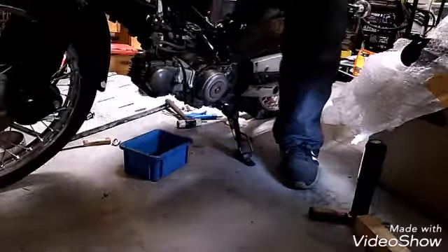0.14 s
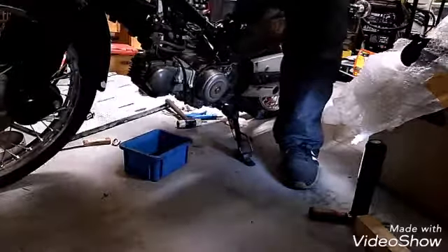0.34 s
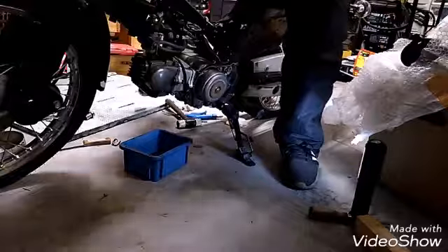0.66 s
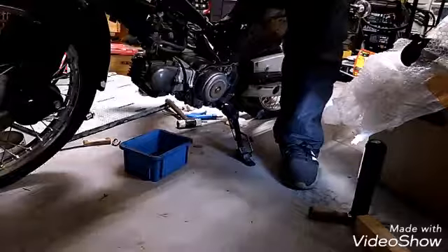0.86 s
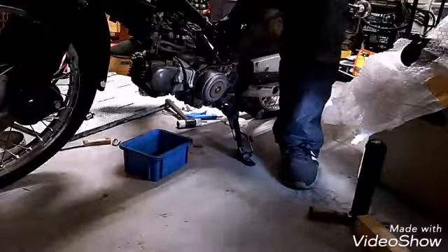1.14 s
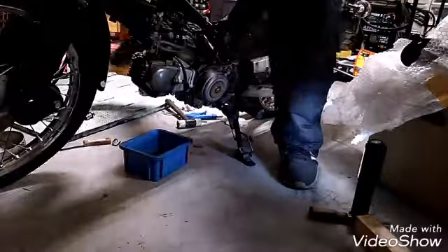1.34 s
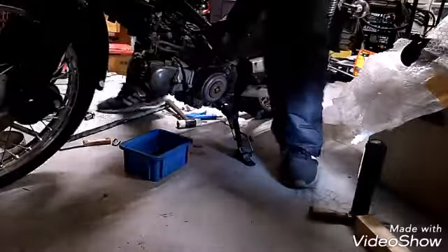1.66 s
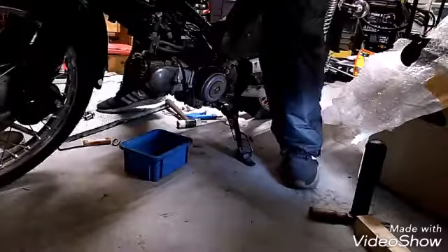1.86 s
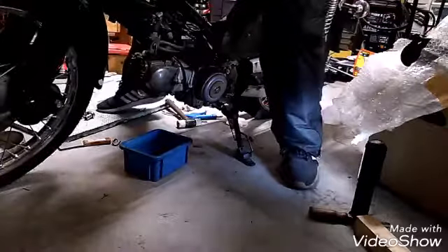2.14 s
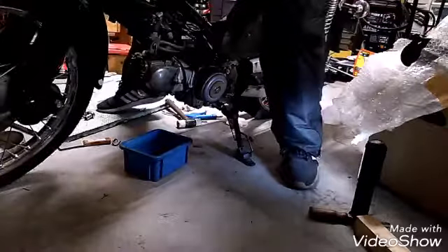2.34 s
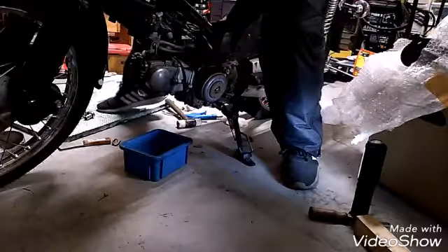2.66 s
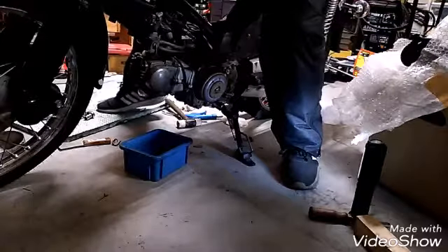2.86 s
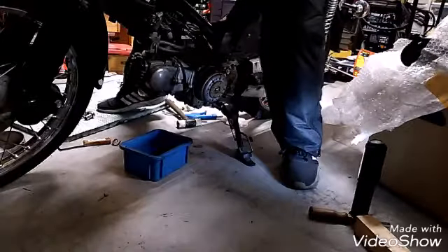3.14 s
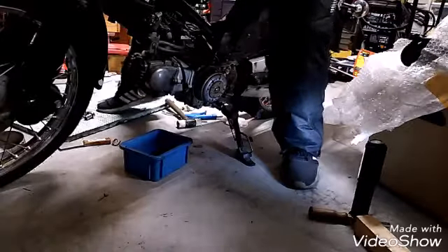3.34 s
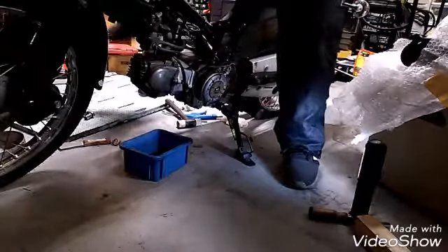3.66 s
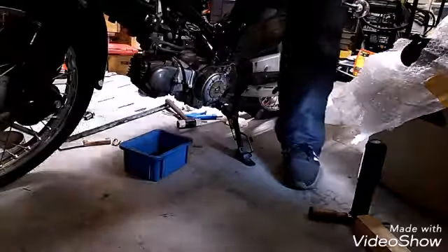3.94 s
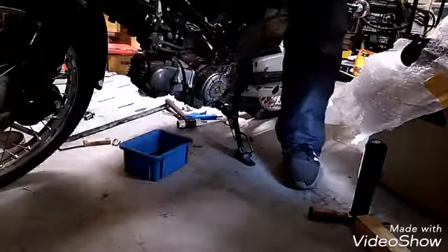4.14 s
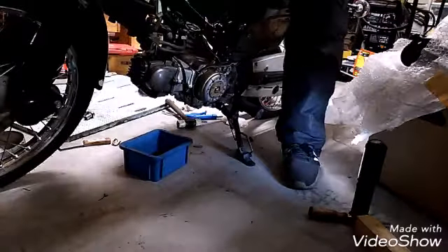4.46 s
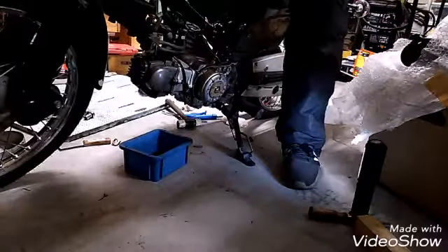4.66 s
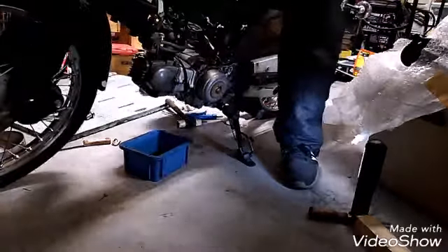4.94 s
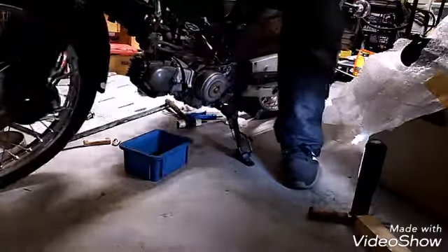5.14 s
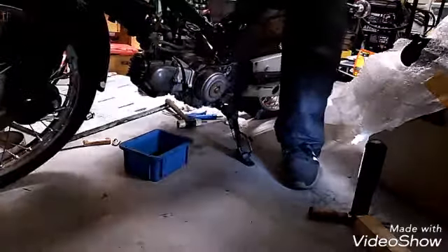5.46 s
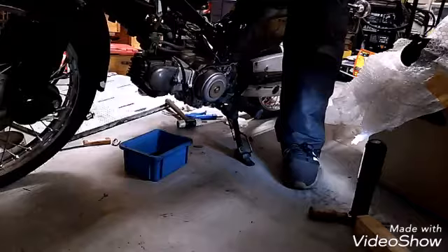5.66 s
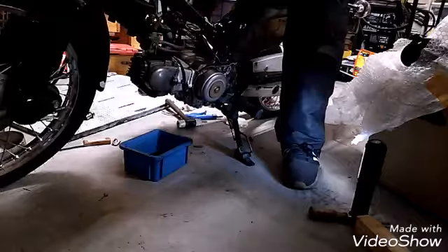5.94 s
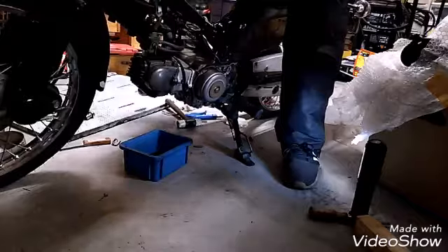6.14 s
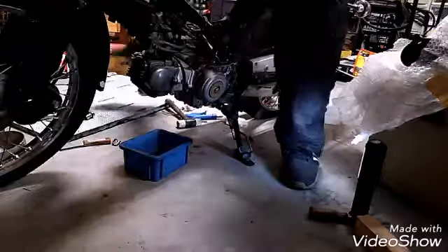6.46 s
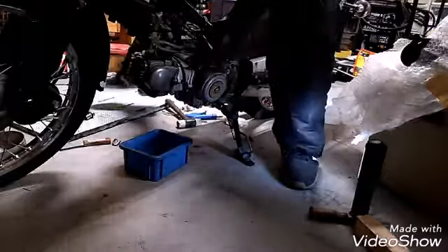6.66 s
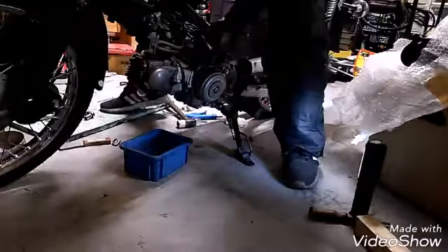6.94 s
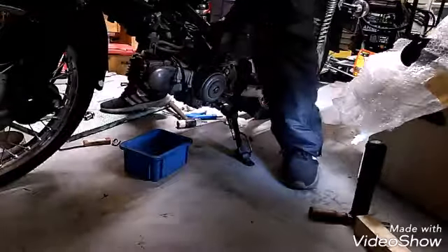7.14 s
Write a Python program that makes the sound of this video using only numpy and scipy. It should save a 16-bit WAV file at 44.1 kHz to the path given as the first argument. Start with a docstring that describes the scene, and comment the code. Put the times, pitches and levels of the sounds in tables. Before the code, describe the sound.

A small single-cylinder motorcycle idles close by in a garage, with low exhaust puffs, dense metallic clatter and loose clanks. It stumbles, recovers, then coasts down with whirring gears and a tiny squeak. Trousers rustle and a shoe taps metal in the quiet. One hard kick thuds and scrapes; the engine catches, flares briefly and idles on, rattling. Close stereo pickup.

```python
"""A garage, two microphones: a small single-cylinder motorcycle idles, falters and coasts to a stop.
Trousers rustle, a shoe taps the kick lever; one kick, and the engine catches, flares and idles again.
It fires every second turn: a boom of crank orders and a bark from the exhaust, three knocks in the cases.
Filtered noise makes the clatter, cloth, scrapes and room tone; decaying modes make the metal ring.
Each blow adds the garage's tail after the direct sound."""
import sys
import numpy as np
from scipy import signal
from scipy.fft import rfft, irfft, next_fast_len
from scipy.io import wavfile
from scipy.ndimage import uniform_filter1d, map_coordinates

SR = 44100
rng = np.random.default_rng(int(sys.argv[2]) if len(sys.argv) > 2 else 0)


def to_wav(s):
    """Save 16-bit WAV."""
    ch = np.atleast_2d(s).T  # columns
    pcm = np.round(np.clip(ch, -1, 1) * 32767)  # PCM
    wavfile.write(sys.argv[1], SR, pcm.astype(np.int16))


N = 321930
TIME = np.arange(N) / SR
SIZE = 2 * next_fast_len(N // 2 + SR // 4)   # transform length, with room for ringing
HZ = np.maximum(np.arange(SIZE // 2 + 1) * SR / SIZE, 1)


def from_db(db):
    """Decibels to gain."""
    return 10 ** (np.asarray(db) / 20)


def curve(points):
    """A table by frequency, joined on a log axis."""
    hz, value = np.transpose(points)
    return np.interp(np.log(HZ), np.log(hz), value)


def below(hz):
    """A steep low-pass slope in dB."""
    return np.maximum(-10 * np.log10(1 + (HZ / hz) ** 8), -90)


def above(hz):
    """The matching high-pass slope in dB."""
    return np.maximum(-10 * np.log10(1 + (hz / HZ) ** 8), -90)


def resonance(hz, width_hz):
    """One narrow peak with steep skirts, in dB."""
    return np.maximum(-20 * np.log10(1 + (2 * (HZ - hz) / width_hz) ** 2), -90)


def ramp(start_s, length_s):
    """Rises evenly from 0 to 1."""
    return np.clip((TIME - start_s) / length_s, 0, 1)


def hump(s, width_s):
    """A bell of height 1."""
    return np.exp(-((TIME - s) / width_s) ** 2)


def flicker(per_s, depth_db):
    """A randomly wandering gain."""
    return from_db(depth_db * np.interp(TIME * per_s, np.arange(N), rng.standard_normal(N)))


def flutter(x, per_s, band_hz, depth_db):
    """Every narrow band swells and sinks on its own, as different parts take turns to sound."""
    hz, s, cells = signal.stft(x, SR, nperseg=512)
    chance = rng.standard_normal(size=(200, 800))
    places = np.meshgrid(hz / band_hz, s * per_s, indexing="ij")
    gain = from_db(depth_db * map_coordinates(chance, places, order=1, mode="wrap"))
    steady = gain / np.sqrt(np.mean(gain ** 2))
    return signal.istft(cells * steady, SR)[1][:, :N]


def causal(x, gain):
    """Minimum-phase filter: resonances ring after their cause."""
    cepstrum = irfft(np.log(gain + 1e-9))
    cepstrum[1:SIZE // 2] *= 2
    cepstrum[SIZE // 2 + 1:] = 0
    return irfft(rfft(x, SIZE) * np.exp(rfft(cepstrum)))[:N]


# how far the two microphones are opposed: f/Hz, side minus mid level/dB
OPPOSED = [(60, 9), (150, 4), (300, 12.5), (500, 8.5), (900, 2), (1500, 2.5), (2200, 1), (4000, 0.5),
           (8000, 1)]


def radiate(drive, colour_db, lifts=(0, 0), opposed_db=0):
    """Countless tiny contacts of strength `drive`, coloured and scattered to both microphones."""
    mid_gain = from_db(colour_db + lifts[0])
    side_gain = from_db(colour_db + lifts[1] + curve(OPPOSED) + opposed_db)
    scale = np.sqrt(np.mean(mid_gain ** 2 + side_gain ** 2))
    mid = causal(drive * rng.standard_normal(N), mid_gain / scale)
    side = causal(drive * rng.standard_normal(N), side_gain / scale)
    return np.array([mid + side, mid - side])


def blows(times, levels_db, t60, rise, garage_db, garage_t60):
    """Envelope of blows: a quick rise, a short ring and the garage's longer tail (times in s)."""
    power, age = np.zeros(N), TIME[:SR // 2]
    # -120 dB here because the shape is a power, not an amplitude
    shape = from_db(-120 * age / t60) + from_db(2 * garage_db - 120 * age / garage_t60)
    shape = shape * (1 - np.exp(-age / rise)) ** 2
    for s, gain in zip(times, from_db(levels_db)):
        at = int(np.clip(s * SR, 0, N - 1))
        power[at:at + len(age)] += gain ** 2 * shape[:N - at]
    return np.sqrt(power)


def modes(times, levels_db, table, uneven_db, contact_hz):
    """Blows ring a table of modes, each with a new strength every time; a low-pass softens the contact."""
    at = np.clip(np.asarray(times) * SR, 0, N - 1).astype(int)
    out = np.zeros(N)
    for hz, db, t60 in table:
        sizes_db = levels_db + db + uneven_db * rng.standard_normal(len(at))
        clicks = np.zeros(N)
        clicks[at] = from_db(sizes_db) * rng.choice([-1, 1], len(at))
        r, w = from_db(-60 / (t60 * SR)), 2 * np.pi * hz / SR
        # the tiny offset keeps the filter's state from fading to denormal numbers
        out += signal.lfilter([0, np.sin(w)], [1, -2 * r * np.cos(w), r * r], clicks + 1e-18)
    return signal.sosfilt(signal.butter(4, contact_hz, fs=SR, output="sos"), out)


def by_hardness(rows, focus_db):
    """Rows of (s, dB, hardness) as rows of (s, thud dB, ring dB, bright dB)."""
    s, db, hardness = np.transpose(rows)
    return np.transpose([s] + [db - focus_db * (hardness - band) ** 2 for band in (0, .5, 1)])


def strikes(rows, colour_db, lifts, t60s, rise, garage_db):
    """Blows that each have their own share of thud, ring and brightness."""
    s, *levels = np.transpose(rows)
    bands = below(1100), above(1600) + below(2900), above(3700)
    parts = []
    for db, t60, band in zip(levels, t60s, bands):
        envelope = blows(s, db, t60, rise, garage_db, garage_t60=0.46)
        parts.append(radiate(envelope, colour_db + band, lifts))
    return sum(parts)


# resonances of the engine cases: f/Hz, width/Hz, common lift/dB, opposed lift/dB
CASES = [(518, 60, 7.5, 10), (610, 81, 4.5, -0.5), (861, 72, 5, 2.5), (865, 640, 6, 12.5),
         (1050, 37, -9, -10), (1710, 92, 2.5, 8), (1880, 100, -2.5, -8.5), (2184, 60, 6, 2.5),
         (2245, 61, -5, -3.5), (2320, 380, 4, 5), (2670, 70, -3.5, 6), (3376, 92, 4.5, 10.5),
         (3636, 94, 8, -1), (4250, 230, 3, 9), (4560, 68, 7, -1), (5075, 250, 7.5, 8.5),
         (5175, 130, -9.5, -9.5), (5326, 65, 7, 3.5), (5790, 79, 3.5, -1.5), (6180, 122, -8.5, -1.5),
         (6250, 320, 1, 9), (6560, 151, 5, -7.5), (7690, 157, -2, -14), (7630, 430, 9, 4)]


def case_lifts():
    """The case resonances as dB bumps, common to both microphones and opposed."""
    bumps = np.array([1 / (1 + (2 * (HZ - hz) / max(width, hz / 50)) ** 2) for hz, width, _, _ in CASES])
    return np.array(CASES)[:, 2:].T @ bumps


# crank speed in each run, from the first firing to the last: t/s, speed/turns per s
FIRST_SPEED = [(0, 23.2), (0.25, 18.9), (0.55, 17.97), (1.1, 20.01), (1.5, 18.21), (1.62, 13.47),
               (1.85, 16.97), (2.1, 19.13), (2.45, 20.1), (2.9, 18.2), (3.08, 14)]
SECOND_SPEED = [(5.105, 27.2), (5.4, 23.67), (5.7, 20.2), (6.1, 19.55), (6.4, 20.89), (7.3, 20.7)]


def speed_runs():
    """For each run, turns completed and turns per second over time; no speed outside the run."""
    speeds = [np.interp(TIME, *np.transpose(run), left=0, right=0) for run in (FIRST_SPEED, SECOND_SPEED)]
    return [(np.cumsum(speed) / SR, speed) for speed in speeds]


def crank_times(phases):
    """The moments in every four-stroke cycle when the crank is `phases` turns past firing; a row per cycle."""
    rows = []
    for turn, speed in speed_runs():
        firings = np.arange(0, turn[-1], 2)
        rows.append(np.interp(firings[:, None] + phases, turn[speed > 0], TIME[speed > 0]))
    return np.vstack(rows)


CATCH_S, CATCH_RISE_S = 5.13, 0.026


def flare(decay_s):
    """Swells as the engine catches, then dies away."""
    return ramp(CATCH_S, CATCH_RISE_S) * np.exp(-np.abs(TIME - CATCH_S) / decay_s)


def restarted(db):
    """A gain that sets in as the engine catches again."""
    return from_db(db * ramp(CATCH_S, CATCH_RISE_S))


# the engine coasts to rest; its noise falls as a power of the motion that is left
COAST_S, REST_S, COAST_POWER = 2.684, 3.264, 4.4


def motion():
    """Share of the motion left in the first run: 1 until it coasts, 0 at rest."""
    return 1 - ramp(COAST_S, REST_S - COAST_S) ** 2


FALTER_S, FALTER_WIDTH_S, FALTER_DB = 1.639, 0.1, -5
# the kick takes up the slack quietly, then spins the crank
SLACK_S, SLACK_DB, SPIN_S, SPIN_RISE_S = 5.004, -20, 5.038, 0.019
FLARE_DB, FLARE_DECAY_S, SECOND_IDLE_DB = 5.5, 0.14, 0.42


def effort():
    """How hard the engine shakes, 1 at the first idle: falter and coast, then kick, flare and idle."""
    first = from_db(FALTER_DB * hump(FALTER_S, FALTER_WIDTH_S)) * motion() ** COAST_POWER
    slack = from_db(SLACK_DB) * ramp(SLACK_S, SPIN_S - SLACK_S)
    started = np.maximum(slack, ramp(SPIN_S, SPIN_RISE_S) ** 2)
    return first + started * from_db(SECOND_IDLE_DB + FLARE_DB * flare(FLARE_DECAY_S))


# spectrum of the garage at rest, in the opposed part of the pair: f/Hz, level/dB per Hz
ROOM = [(18, -24), (30, 5.5), (92, 0.5), (176, -6.5), (400, -11), (629, -19), (794, -25), (2080, -31.5),
        (5170, -34), (6700, -21.5), (9390, -37.5), (10400, -46), (15000, -51.5)]
ROOM_DB = -68.5


def room_tone():
    """The quiet garage: steady noise, scattered to both microphones."""
    return radiate(from_db(ROOM_DB), curve(ROOM) - curve(OPPOSED))


# the leg moves in smooth swells: start t/s, length/s, rub level/dB, hiss level/dB
LEG_MOVES = [(3.401, 0.76, -2, -1), (3.502, 0.083, -10, -12), (3.648, 0.14, -25, -7),
             (3.796, 0.31, -3, -15), (4.108, 0.37, -6.5, -4), (4.496, 0.095, -10.5, -9.5)]
SWELL_POWER = 0.75


def leg_motion():
    """Strength of the cloth's dull rub and of its hiss over time."""
    arches = [np.sin(np.pi * ramp(s, length)) for s, length, _, _ in LEG_MOVES]
    swells = np.abs(arches) ** SWELL_POWER
    return from_db(np.array(LEG_MOVES)[:, 2:].T) @ swells


# spectrum of trousers and shoe: f/Hz, level/dB per Hz
CLOTH = [(59, -29), (100, 17), (217, 2), (279, -3), (452, -11), (570, -5.5), (748, -4.5), (849, -9),
         (1000, -5.5), (3180, -10.5), (3920, -8.5), (5300, -6), (6600, -6), (7600, -5.5), (15000, -50)]
RUB_DB, HISS_DB, SWAY_DB = -57.5, -54, -66.5
# shoe on lever and floor: t/s, level/dB, hardness (0 thud, 1 bright scuff), favoured frame pitch f/Hz
TAPS = [(3.425, -51.5, 0.83, 1400), (3.547, -52, 0.46, 760), (3.834, -54, 0.11, 740),
        (3.899, -45.5, 0.32, 1200), (3.908, -49, .1, 760), (3.94, -54, .05, 760), (4.345, -47, 0.073, 1330),
        (4.354, -49.5, 0.063, 540), (4.378, -51, 0.074, 540), (4.516, -57, 0.95, 1400),
        (4.535, -56, 1.3, 1400), (4.618, -64, 0.95, 1400), (4.684, -60, 1.04, 1400),
        (4.696, -63.5, 0.99, 1400), (4.87, -71, 0.35, 590)]
TAP_FOCUS_DB = 46
# the frame under a thudding tap or the kick: f/Hz, level/dB, t60/s
FRAME = [(483, -7, 0.23), (600, 1, 0.12), (738, 4.5, .15), (1160, 8, 0.096), (1330, 1, 0.069),
         (1450, -2, 0.11), (1590, 0, 0.11), (2094, -9, .1), (2430, 1, .05)]
FRAME_DB, FRAME_FOCUS_DB = -2, 31   # the last: loss one octave from the favoured pitch
# kick lever clicking on its pivot: t/s, level/dB, sharpness of contact f/Hz
CLICKS = [(3.427, -39.5, 4200), (4.69, -55, 9100)]
# modes of the kick lever: f/Hz, level/dB, t60/s
LEVER = [(1790, -10, 0.058), (1890, -7.5, 0.044), (2100, -19, .025), (3770, -17, .05), (4450, -19, .05),
         (5500, -2.5, .05), (6630, 2, .055), (7100, -2, .045), (7950, -5, .05)]


def rider():
    """Cloth slides as the leg lifts; the shoe taps the lever, which clicks, and the frame rings and rocks."""
    rubbing, hissing = leg_motion()
    rub_drive = from_db(RUB_DB) * rubbing * flicker(40, depth_db=1.0)
    rub = radiate(rub_drive, curve(CLOTH) + above(330) + below(3200))
    hiss_drive = from_db(HISS_DB) * hissing * flicker(530, depth_db=0.5)
    hiss = radiate(hiss_drive, curve(CLOTH) + above(2500))
    cloth = flutter(rub + hiss, per_s=27, band_hz=246, depth_db=3.5)

    touches, pitch = by_hardness(np.array(TAPS)[:, :3], TAP_FOCUS_DB), np.array(TAPS)[:, 3]
    tap_colour = curve(CLOTH) + above(306)
    taps = strikes(touches, tap_colour, (0, 0), t60s=(.08, .055, .05), rise=0.001, garage_db=-13.0)

    s, thud, _, _ = touches.T
    frame = np.zeros(N)
    for mode in FRAME:
        off_pitch_db = FRAME_FOCUS_DB * np.log2(mode[0] / pitch) ** 2
        frame += modes(s, thud + FRAME_DB - off_pitch_db, [mode], uneven_db=3.0, contact_hz=3000)
    clicks = sum(modes([s], db, LEVER, uneven_db=2.0, contact_hz=hz) for s, db, hz in CLICKS)
    metal = frame * np.array([[1], [-.4]]) + clicks * np.array([[1], [-.2]])
    rocking = radiate(from_db(SWAY_DB) * rubbing, above(66) + below(115) + below(164))
    return cloth + taps + metal + rocking


# the cover rings more in swells: t/s, width/s, lift/dB
COVER_SWELLS = [(.45, 1, 5.8), (5.2, 0.32, 6.5), (7.059, 0.12, 18)]
COVER_DB = -51


def cover(force, hz=499, width_hz=17):
    """Engine vibration keeps a thin loose cover ringing in a narrow band."""
    swell_db = sum(db * hump(s, width) for s, width, db in COVER_SWELLS)
    return radiate(force * from_db(COVER_DB + swell_db), resonance(hz, width_hz))


# what slack parts chatter with: f/Hz, level/dB, t60/s
LOOSE = [(1233, 3, 0.035), (1444, 4, 0.056), (1741, 6, 0.061), (2216, 3.5, .09), (2510, 2.5, 0.11),
         (2720, 3.5, 0.13), (4670, 5, 0.09), (5070, 4, 0.0896), (5500, 2, 0.21), (6490, 7, 0.047)]
RATTLE_DB, RATTLE_RESTART_DB = -44.5, 0.5   # the second is added after the restart


def loose_parts(force, uneven_db=4.0):
    """Slack parts chatter at random, and each touch rings a few modes more than the rest."""
    def chatter():
        return modes(rng.uniform(0, N / SR, size=420), -9.5, LOOSE, uneven_db, contact_hz=7000)
    common, opposed = chatter(), chatter()
    level = from_db(RATTLE_DB) * restarted(RATTLE_RESTART_DB) * force
    return level * np.array([common + opposed, common - opposed])


# what a clanking part rings with: f/Hz, t60/s
CLANK_MODES = [(880, 0.042), (1440, 0.077), (1600, 0.076), (1750, 0.08), (2205, 0.068), (2480, 0.028),
               (3150, 0.035), (3590, 0.08), (4150, 0.03), (4600, 0.05), (5355, 0.046)]
CLANK_RING_DB, SOFTEST_HZ, HARDNESS_OCTAVES = -3, 623, 3.25
OFF_PITCH_DB = 56.5   # loss one octave off, growing as the square


def clank_ring(clanks):
    """Each clank rings the few modes near the pitch that its hardness sets."""
    s, db, hardness = np.transpose(clanks)
    pitch = SOFTEST_HZ * 2 ** (HARDNESS_OCTAVES * hardness)
    ring = np.zeros(N)
    for hz, t60 in CLANK_MODES:
        level_db = db + CLANK_RING_DB - OFF_PITCH_DB * np.log2(hz / pitch) ** 2
        ring += modes(s + 0.00201, level_db, [(hz, 0, t60)], uneven_db=0.5, contact_hz=8100)
    return ring


# spectrum of metal on metal, shared by clanks, ratchet and clatter: f/Hz, level/dB per Hz
METAL = [(60, -13), (180, -10.5), (300, -5.5), (700, -14.5), (1400, 2), (2300, -2), (3100, -1.5),
         (5000, -0.5), (6600, 0.5), (7800, -8.5), (9000, -12), (10200, -24.5), (12000, -38), (15000, -47)]
# loud clanks from the engine and its slack parts: t/s, level/dB, hardness (0 thud, .5 ring, 1 bright crack)
CLANKS = [(1.573, -28, 0.45), (1.678, -21.5, 0.24), (1.70, -33, 0.11), (1.806, -24, 0.27),
          (1.961, -27.5, 0.71), (2.299, -21, 0.99), (2.381, -20, 0.69), (2.386, -22.5, 0.94),
          (2.863, -31.5, 0.48), (5.228, -23, 0.53), (5.321, -26.5, 0.44), (5.544, -23, 0.28),
          (5.407, -31, 0.57), (5.635, -25.5, 0.57), (6.046, -19.5, 0.56), (6.119, -29, 0.51),
          (6.289, -23.5, 0.54), (6.405, -28, 0.036), (6.652, -33, 0.51), (6.697, -30.5, 0.4),
          (6.805, -27.5, 0.28), (6.825, -21.5, 0.46), (6.865, -39, 0.25), (6.995, -17.5, 0.61),
          (7.011, -25, 0.78), (7.033, -28.5, .4), (7.059, -26, 0.53), (7.085, -22, 0.76),
          (7.226, -28, 0.49), (7.274, -24.5, 0.45)]
CLANK_FOCUS_DB = 35.5


def clacks(lifts, sharpen=1.2, crack_db=1.0, common_db=-4.5):
    """Hard metal blows: a crack, and the parts and cases ring on."""
    clanks = np.array(CLANKS)
    rows = by_hardness(clanks + [0, crack_db, 0], CLANK_FOCUS_DB)
    colour = curve(METAL) + above(280)
    crack = strikes(rows, colour, sharpen * lifts, t60s=(.055, .04, .035), rise=0.0028, garage_db=-14)
    common, opposed = from_db(common_db) * clank_ring(clanks), clank_ring(clanks)
    return crack + np.array([common + opposed, common - opposed])


# spectrum of gears and chain: f/Hz, level/dB per Hz
GEARS = [(1900, -15.5), (2180, -6), (2380, -14.5), (2570, -2.5), (2950, -14), (3900, -9.5), (4250, -0.5),
         (4750, -17), (5150, -4.5), (5800, -25), (6400, 8.5), (6630, -6), (6850, 0), (7500, -12.5),
         (8500, -11), (11000, -50)]
# surges as the slowing crank drags over compression: t/s, level/dB
SURGES = [(2.848, -36), (2.955, -39), (3.015, -39)]
WHIRR_DB, WHIRR_FROM_S, WHIRR_RISE_S = -41, 1.8, 1.2
WHIRR_POWER = 2.35   # fades more slowly than the rest
SQUEAK_S, SQUEAK_DB, SQUEAK_HZ = 3.165, -50.5, 8480


def whirr(lifts):
    """Gears and chain sing on as the drive goes slack, surge, and squeak once as the crank stops."""
    song = from_db(WHIRR_DB) * ramp(WHIRR_FROM_S, WHIRR_RISE_S) * motion() ** WHIRR_POWER
    surges = blows(*np.transpose(SURGES), t60=0.093, rise=0.015, garage_db=-18.0, garage_t60=0.23)
    gears = radiate(np.hypot(song, surges) * flicker(70, depth_db=5.5), curve(GEARS), 0.26 * lifts)
    squeak = blows([SQUEAK_S], [SQUEAK_DB], t60=0.056, rise=0.0032, garage_db=-23, garage_t60=0.2)
    return gears + radiate(squeak, resonance(SQUEAK_HZ, width_hz=340))


# ratchet bites, lever hits its stop and springs back: t/s, thud, scrape and spring ring level/dB
KICK = [(5.042, -36, -41, -55), (5.053, -34, -26, -42), (5.063, -15.5, -21, -43), (5.075, -18, -38, -50),
        (5.146, -23, -28, -44), (5.171, -32, -24, -39), (5.179, -25, -22, -16.5), (5.198, -39, -25, -18),
        (5.218, -40, -33, -30)]
KICK_RING_DB = -14.5   # ring of the frame, against the thud
# spectra of the thud and of the return spring: f/Hz, level/dB per Hz
THUD = [(100, -17), (250, -8.5), (340, -0.5), (700, -2), (1000, -3), (1250, 0), (1750, 1), (2100, -17),
        (3500, -13), (8000, -50), (12000, -60)]
SPRING = [(4300, -28.5), (4800, -21), (5080, -3), (5400, -18), (5750, -9), (6000, -16), (6700, -26),
          (9000, -31), (12000, -60)]


def kick(lifts):
    """The lever thuds into the cases and rings the frame; ratchet scrapes, return spring sings."""
    s, thud, scrape, spring = np.transpose(KICK)
    impact = blows(s, thud, t60=0.038, rise=0.00085, garage_db=-9.5, garage_t60=0.44)
    body = radiate(impact, curve(THUD), 0.81 * lifts)
    teeth = blows(s, scrape, t60=0.049, rise=0.0012, garage_db=-11.5, garage_t60=0.13)
    teeth = teeth * flicker(700, depth_db=3.5)
    ratchet = radiate(teeth, curve(METAL) + above(2500), 0.81 * lifts)
    recoil = blows(s, spring, t60=0.052, rise=0.0014, garage_db=-15.0, garage_t60=0.36)
    song = radiate(recoil, curve(SPRING), opposed_db=-3.5)
    frame = modes(s, thud + KICK_RING_DB, FRAME, uneven_db=1.0, contact_hz=3000)
    return body + ratchet + song + frame * np.array([[1], [-.4]])


LULL_TURNS, LULL_WIDTH_TURNS, LULL_DB = 1.015, 0.28, -3


def cycle_lull():
    """The low clatter sinks once a cycle, about one turn after firing."""
    phase = sum(turn % 2 * (speed > 0) for turn, speed in speed_runs())
    return from_db(LULL_DB * np.exp(-((phase - LULL_TURNS) / LULL_WIDTH_TURNS) ** 2))


RUMBLE_DB, BRIGHT_DB = -34, -33


def clatter(force, knock_times, lifts, tick_db=1.5):
    """Valve gear, chain and gears: a dense rattle with uneven ticks, its treble swelling at each knock."""
    loose = (np.arange(400) + rng.uniform(-1, 1, size=400)) * TIME[-1] / 400
    ticks_db = tick_db + 2 * rng.standard_normal(len(loose))
    ticks = blows(loose, ticks_db, t60=0.047, rise=0.0032, garage_db=-11.0, garage_t60=0.18)
    swells_db = np.full(len(knock_times), -1.5)
    swell = blows(knock_times, swells_db, t60=0.08, rise=0.0015, garage_db=-16.0, garage_t60=0.24)

    low_grain = np.sqrt(0.82 + ticks ** 2) * flicker(60, depth_db=0.63)
    low_drive = from_db(RUMBLE_DB) * force * cycle_lull() * low_grain
    low = radiate(low_drive, curve(METAL) + below(2710), lifts)
    grain = np.sqrt(0.46 + ticks ** 2 + swell ** 2) * flicker(1500, depth_db=1.0)
    bright = radiate(from_db(BRIGHT_DB) * force * grain, curve(METAL) + above(2350), lifts)
    return low + bright


# spectrum of the knocks: f/Hz, level/dB per Hz
KNOCK = [(200, -22.5), (450, -21), (800, -7), (1300, -4.5), (1750, -18.5), (2400, -8.5), (5000, -34),
         (8000, -22), (11000, -52.5)]
# piston slap in the barrel: f/Hz, level/dB, t60/s
SLAP = [(894, -21.5, 0.03), (1230, -6.5, 0.013), (1303, -10, 0.026), (1616, -8, 0.058), (1680, -23, 0.033),
        (2440, -11.5, 0.015)]
KNOCK_DB, SLAP_DB = -35, -43


def knocks(force, times, levels_db, lifts, uneven_db=2.0):
    """Piston and valves knock and the cases rattle; the slap comes in three quick contacts."""
    sizes_db = levels_db + uneven_db * rng.standard_normal(len(times))
    drive = blows(times, KNOCK_DB + sizes_db, t60=0.026, rise=0.0061, garage_db=-9, garage_t60=0.3)
    slap = np.zeros(N)
    for _ in range(3):
        contacts = times + rng.uniform(0, 0.006, len(times))
        slap += modes(contacts, sizes_db, SLAP, uneven_db=0.0, contact_hz=2790)
    slap = slap / np.std(slap) * from_db(SLAP_DB) * np.array([[1], [-.8]])
    return force * (radiate(drive, curve(KNOCK), lifts) + slap)


# modes of the silencer: f/Hz, level/dB, t60/s
BARK = [(198, -2.5, 0.08), (310, -9, 0.05)]
BARK_TURNS, BARK_DB, BARK_RESTART_DB = 1.84, -31.5, 5   # turns after firing; the last: gain after restart


def bark(force):
    """The silencer barks once in every firing cycle, in opposite sign at the two microphones."""
    pops = modes(crank_times(BARK_TURNS).ravel(), BARK_DB, BARK, uneven_db=1.5, contact_hz=700)
    return force * restarted(BARK_RESTART_DB) * pops * np.array([[1], [-1]])


# exhaust pipe response: f/Hz, level/dB
PIPE = [(36, -26.5), (47, -5.5), (57, -9), (76, -3), (95, -3.5), (112, -11.5), (128, -3.5), (150, -12.5),
        (200, -20)]
PUFF_DB, PUFF_FLARE_DB, PUFF_FLARE_DECAY_S = -37, 5.5, .25
EXHAUST_UNEVEN_DB = 3.8   # spread of each order from turn to turn


def exhaust(force, half_order_db=0.5, follows=.8, crest_turns=.2):
    """The muffled puffs boom as crank orders; every other turn differs, which adds half orders."""
    boom = np.zeros(N)
    for turn, rate in speed_runs():
        live = rate > 0
        for order in np.arange(4, 27) / 2:
            is_half = order % 1 > 0
            db = np.interp(order * rate[live], *np.transpose(PIPE), left=-90) + half_order_db * is_half
            db += EXHAUST_UNEVEN_DB * np.interp(turn[live], np.arange(64), rng.standard_normal(64))
            # the low whole orders crest together; the others have a scattered phase
            scatter = rng.uniform(0, 2 * np.pi) * (order > 6 or is_half)
            wave = np.cos(2 * np.pi * order * (turn[live] - crest_turns) + scatter)
            boom[live] += uniform_filter1d(from_db(db), size=400) * wave
    puff = force ** follows * from_db(PUFF_DB + PUFF_FLARE_DB * flare(PUFF_FLARE_DECAY_S))
    muffler = signal.butter(4, 900, fs=SR, output="sos")
    return signal.sosfilt(muffler, boom * puff) * np.array([[.92], [-1.04]])


# piston and valve knocks of one cycle: turns after firing, level/dB
CYCLE_KNOCKS = [(0.35, 1.5), (1.42, -2), (1.84, -8)]


def scene():
    """The quiet garage, the rider, the rattles and the engine."""
    phases, knock_db = np.transpose(CYCLE_KNOCKS)
    cycles = crank_times(phases)
    times, levels_db = cycles.ravel(), np.tile(knock_db, len(cycles))
    lifts, force = case_lifts(), effort()
    background = room_tone() + rider()
    rattles = cover(force) + loose_parts(force) + clacks(lifts) + whirr(lifts)
    moving_parts = flutter(clatter(force, times, lifts), per_s=60, band_hz=219.2, depth_db=3.0)
    engine = moving_parts + knocks(force, times, levels_db, lifts) + bark(force) + exhaust(force)
    return background + rattles + kick(lifts) + engine


# treble balance of the microphones: f/Hz, left minus right level/dB
LEAN = [(500, 0), (1300, 0), (2100, 2), (4400, 4), (5100, 2.5), (6400, 5), (6900, -4), (7600, -8),
        (9000, -3), (14000, -10.5)]
CUTOFF_HZ = 15300


def record(dry):
    """Each microphone has its own treble colour; the top is cut."""
    lean = curve(LEAN) / 2
    pair = np.array([causal(dry[0], from_db(lean)), causal(dry[1], from_db(-lean))])
    return signal.sosfilt(signal.ellip(10, .2, 70, CUTOFF_HZ, fs=SR, output="sos"), pair)


dry = scene()
out = record(dry)
to_wav(out)
```